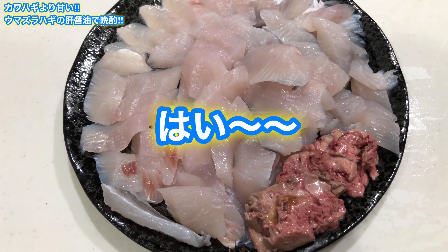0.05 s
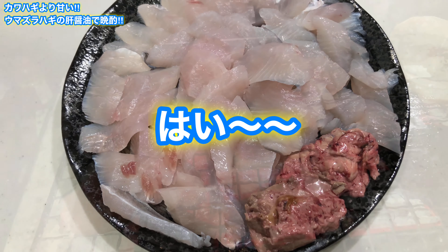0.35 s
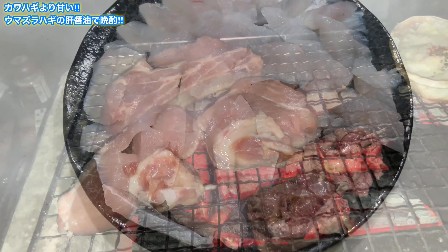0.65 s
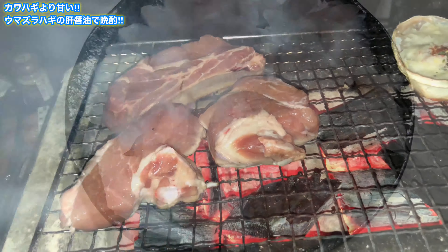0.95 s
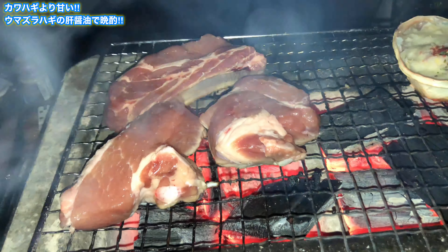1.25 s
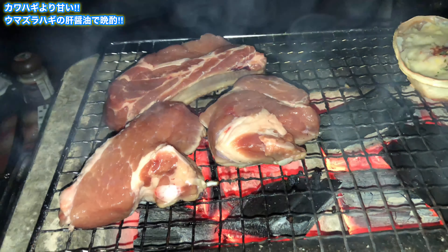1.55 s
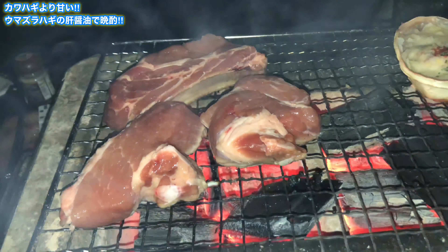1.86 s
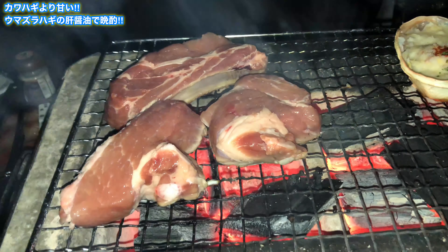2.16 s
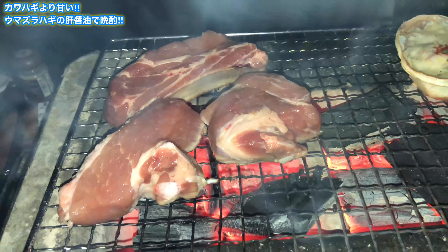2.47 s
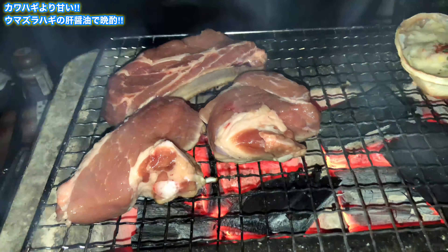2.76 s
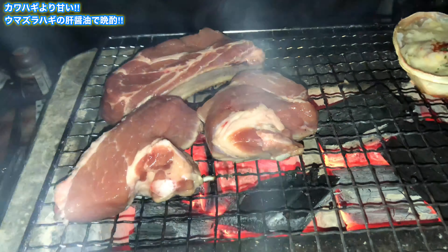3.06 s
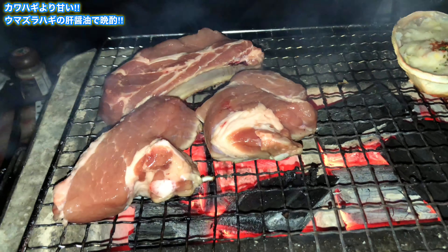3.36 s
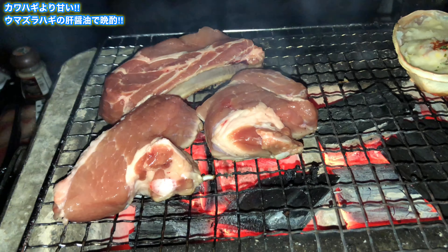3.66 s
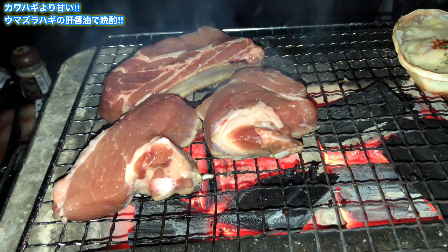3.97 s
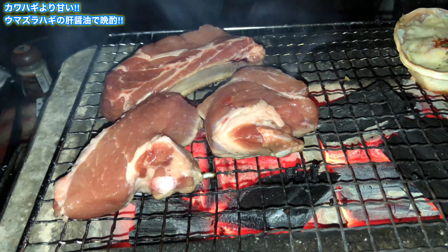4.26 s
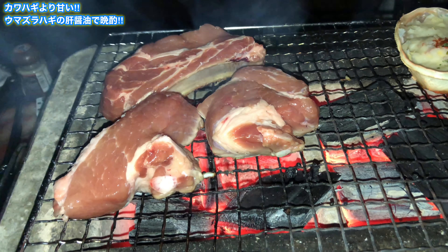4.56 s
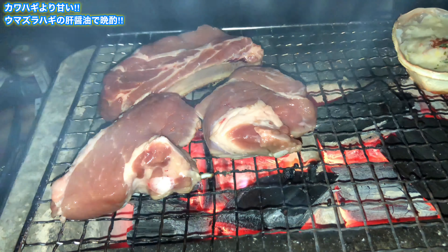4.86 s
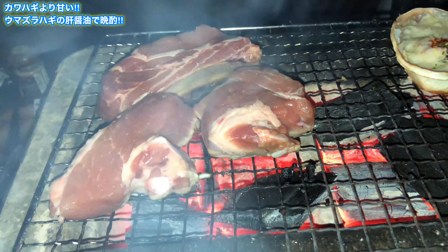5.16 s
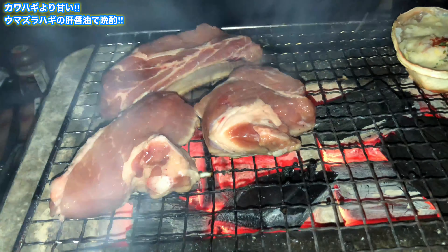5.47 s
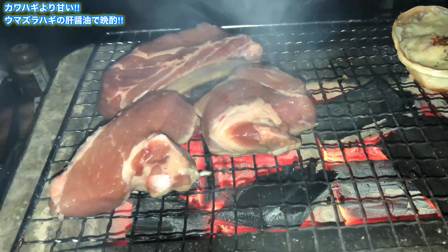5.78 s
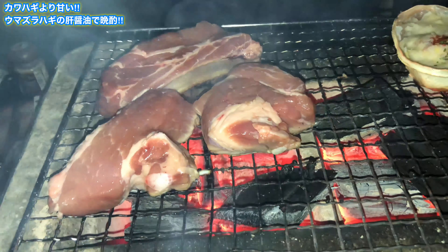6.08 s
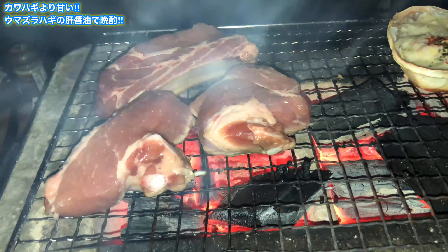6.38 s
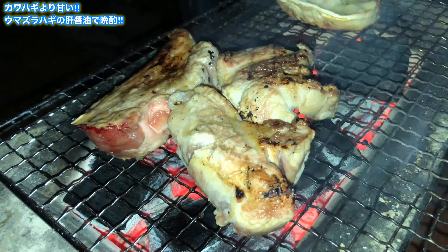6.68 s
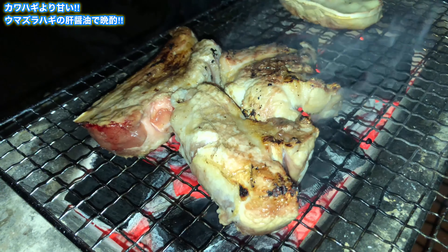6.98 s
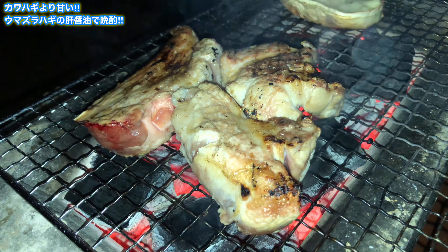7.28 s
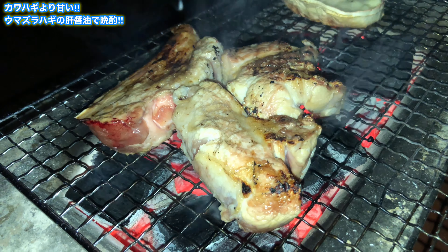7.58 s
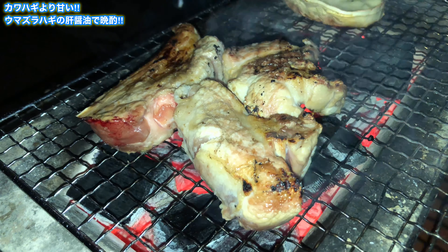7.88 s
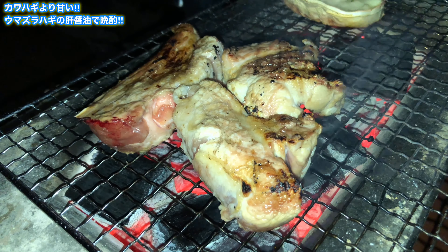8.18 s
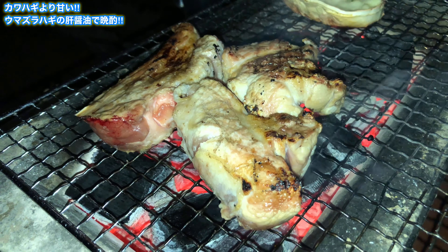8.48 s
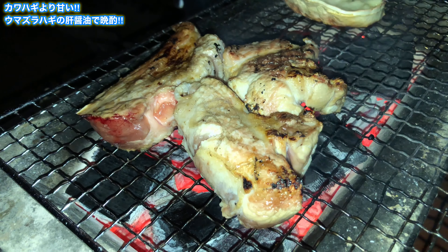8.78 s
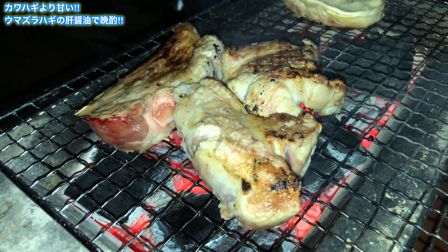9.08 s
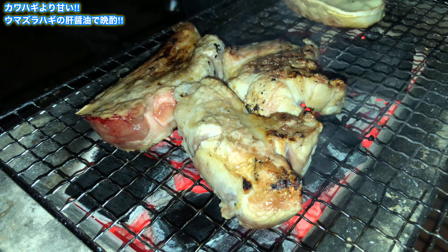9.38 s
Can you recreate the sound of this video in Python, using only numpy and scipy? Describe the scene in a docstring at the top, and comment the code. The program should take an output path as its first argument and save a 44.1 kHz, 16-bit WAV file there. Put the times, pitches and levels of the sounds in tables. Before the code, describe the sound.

Close sizzling and crackling of meat on a wire grill outdoors, with scattered fat pops and a soft low rumble underneath.

```python
"""Meat sizzles on a wire grill over charcoal, close up and outdoors. Countless tiny bubbles of fat burst into a
fizz; larger ones pop with a crack, and each pop is followed by a short low chirp. The grill fades in raw; after
a brief dip in level the meat is browned and the sizzle is louder. Underneath lie a low outdoor rumble that
steps up with it, soft gusts and faint distant hums."""
import sys
import numpy as np
from scipy import signal
from scipy.fft import rfft, irfft
from scipy.io import wavfile

SR = 44100
rng = np.random.default_rng(int(sys.argv[2]) if len(sys.argv) > 2 else 0)


def unload_wav(signal):
    """Save mono or channel-first audio to the path in sys.argv[1] as 16-bit WAV at rate SR, clipped to [-1, 1]."""
    wavfile.write(
        sys.argv[1],
        SR,
        np.round(np.clip(np.atleast_2d(signal).T, -1, 1) * 32767).astype(np.int16),
    )


N = 420713
TIME = np.arange(N) / SR
BROWNED_S = 6.55  # raw meat before this, browned after

# loud pops of fat: start_s, level_db, chirp_db, treble_db (the last two relative to level_db)
POPS = [(0.4246, -52, -1, 1), (0.495, -54, -6, 2.5), (0.7282, -51, -2.5, -1.5), (0.9879, -43, -5, -1),
        (1.0846, -44.5, -12, 1), (1.4746, -40, -10, 6.5), (1.4858, -39.5, 2, -1), (2.3296, -31, -2, 7.5),
        (2.4806, -23.5, -6, -4), (2.5687, -44.5, -3, -4), (2.7797, -37.5, -7, 3.5),
        (2.7953, -31.5, -3, 2.5), (2.8327, -46, -10, 1), (2.858, -39, -18, 5), (2.8816, -43, -8, 8),
        (2.892, -34.5, -9.5, 8.5), (2.9705, -39, -11, 3.5), (3.2439, -37, -5, 0.5),
        (3.7413, -39.5, -25, 1.5), (3.758, -33, -10, 0.5), (3.914, -36.5, -9, 3), (4.084, -42.5, -21, 2.5),
        (4.1931, -33.5, -5.5, -0.5), (4.3349, -41, -10, 4.5), (4.4108, -33, -6, 5.5),
        (4.6794, -35.5, -7, -0.5), (4.6928, -28.5, -10, -5), (4.703, -41, 3, 6.5), (4.8749, -37, -11, 1),
        (4.9874, -40.5, -5, 3), (5.109, -39, -11, 5.5), (5.2228, -38, -14, 10), (5.48, -42, -5, -1.5),
        (5.767, -42.5, -18, 3), (5.8827, -38.5, -7.5, 3.5), (5.904, -43.5, 3, 3), (6.048, -41.5, -6.5, 13),
        (6.1468, -39, -6, 5.5), (6.2565, -42, -4, -11), (6.7873, -28.5, -10.5, 3),
        (7.0514, -31.5, -19, -2.5), (7.1977, -35.5, -1.5, 5), (7.4675, -22.5, -11, -1.5),
        (7.8052, -29, -14, -3.5), (8.3535, -29.5, -8.5, -0.5), (8.5245, -33, -11, 4),
        (8.7014, -32.5, -12, 1), (8.758, -38.5, -7, 7), (8.7867, -27.5, -5, 3), (9.4965, -39.5, -22, 3)]


def sizzle(hiss_db=-5.0, flutter_db=2.5):
    """Near ticks, dense froth and hiss, voiced as a mid crackle and a high fizz that ride the boil."""
    # EQ curves of the bursting fat: frequency_hz, gain_db
    raw_eq = [(300, -11.5), (800, 0), (1250, -4.5), (1800, -1), (2800, -2), (3400, -3), (4300, -2),
              (4750, 2.5), (5300, -1.5), (7000, -4), (9000, -16.5)]
    browned_eq = [(300, -32), (800, -13), (1400, -7.5), (1900, -4.5), (2600, -0.5), (3300, -0.5),
                  (3900, -4), (4750, 0), (5600, -2), (7000, -2.5), (9000, -17.5)]
    fizz_eq = [(3000, -48.5), (5500, -23), (7000, -7.5), (8500, 0.5), (10500, 3), (13000, 2), (16500, 0)]
    ticks = bubbles(per_s=135, spread_db=7.5, max_spreads=2.29, decay_s=0.00043, chirp_gain=0.37)
    froth = bubbles(per_s=1400, spread_db=2.5, max_spreads=3.1, decay_s=0.00071, chirp_gain=0)
    hiss = gain_of(hiss_db + flutter_db * wander(48)) * rng.standard_normal(N)
    browned = TIME > BROWNED_S
    ticks *= gain_of(np.where(browned, -4.8, -2.3))  # on browned meat the ticks merge into froth
    bed = gain_of(-5.5) * froth + hiss
    frying = ticks + bed
    crackle = np.where(browned, unit_rms(colour(frying, browned_eq)), unit_rms(colour(frying, raw_eq)))
    fizz = unit_rms(colour(0.93 * ticks + bed, fizz_eq))  # the high fizz mixes ticks, froth and hiss
    fizz *= gain_of(0.46 * wander(39))  # the treble flickers
    boil_db, spray = boil(), spatter()
    crackle_gain = fader(raw_db=-52.5, browned_db=-47, start_s=0.19, fade_s=0.98)
    crackle_gain *= gain_of(0.61 * boil_db)  # the crackle follows the boil only partly
    fizz_gain = fader(raw_db=-48.5, browned_db=-44.5, start_s=0.27, fade_s=0.8) * gain_of(boil_db)
    return np.hypot(crackle_gain, spray) * crackle + np.hypot(fizz_gain, spray) * fizz


def bubbles(per_s, spread_db, max_spreads, decay_s, chirp_gain, clump_db=3, voices=48):
    """Bubbles of many sizes and pitches burst in random clumps; chirp_gain adds a tiny falling chirp."""
    out, t = np.zeros(N), np.arange(SR // 60) / SR
    odds = gain_of(clump_db * wander(14))
    onsets = np.flatnonzero(rng.random(N) < per_s / SR * odds / odds.mean())
    sizes = gain_of(spread_db * np.minimum(rng.exponential(1, len(onsets)), max_spreads))
    clicks = []
    for hz in np.linspace(1200, 15500, voices):
        tear = burst(t, decay_s * 2 ** rng.uniform(-0.72, 1), snap=0.7)
        clicks.append(unit_rms(ring(tear, hz, resonance=4.2, q=hz / 1100)))
    body = chirp_gain * unit_rms(chirp(t, hz=1400, swell_s=0.001, hold=0.83))
    picks = rng.integers(0, voices, len(onsets))
    body_shares = rng.random(len(onsets)) ** 2
    for onset, size, pick, share in zip(onsets, sizes, picks, body_shares):
        add(out, onset / SR, size * (clicks[pick] + share * body))
    return unit_rms(out)


def boil(full_boil_s=1.81, warm_db_per_s=3):
    """How hard the fat boils, in dB from its steady state: it warms up, then swells with each spurt."""
    # spurts as juice reaches the heat: middle_s, length_s, rise_db
    spurts = [(1.46, 0.25, 2.5), (2.847, 0.11, 6.5), (3.28, 0.096, 3.5), (3.856, 0.2, 8), (4.27, 0.072, 7),
              (4.44, 0.036, 10), (4.88, 0.16, 9), (5.5, 0.25, 5.5), (5.882, 0.23, 4.5), (6.076, .1, 7),
              (6.396, 0.084, 7.5), (6.87, 0.4, 4.5), (7.24, 0.21, 4), (7.483, 0.046, 7), (7.93, 0.027, 12),
              (8.71, 1.67, 5)]
    warming_db = warm_db_per_s * np.minimum(TIME - full_boil_s, 0)
    return warming_db + sum(db * swell(middle_s, length_s) for middle_s, length_s, db in spurts)


def pops(crack_trim_db=0.5, spit_trim_db=4.0, centre_hz=2050):
    """Each loud pop sounds as a crack and a bright spit, followed by a short low chirp."""
    # EQ curves of a pop's mid crack and bright spit: frequency_hz, gain_db
    crack_eq = [(300, -24), (1050, -9.5), (1800, 5), (2700, 4.5), (3900, 2), (5000, 1), (6200, -3.5),
                (8000, -5), (16000, -24)]
    spit_eq = [(2000, -80), (5000, -13.5), (7000, -1.5), (10000, 6), (13000, 4), (16000, 5)]
    out, t = np.zeros(N), np.arange(SR // 25) / SR
    for start_s, level_db, chirp_db, treble_db in POPS:
        if start_s > BROWNED_S:  # crust cracks higher; a near-steady chirp sits over a lower one
            stiffness = 1.12
            body = chirp(t, hz=908, swell_s=0.0019, hold=26.0)
            body += 0.96 * chirp(t, hz=520, swell_s=0.002, hold=2.7)
        else:  # one falling chirp, deeper for a louder pop
            stiffness = 1
            body = chirp(t, hz=1150 / 2 ** ((level_db + 26) / 40), swell_s=0.00172, hold=1.08)
        tear = burst(t, 0.00064 * 2 ** rng.uniform(-0.46, 1), snap=0.58)
        add(tear, rng.uniform(0.0011, 0.0027), 0.38 * burst(t, 0.00044, snap=0))  # the film tears twice
        # a pop with more chirp and less treble rings lower
        ring_hz = centre_hz * 2 ** (treble_db / 5.5 - chirp_db / 15.5)
        tear = ring(tear, ring_hz, resonance=1.3, q=2.2)
        crack = colour(tear, crack_eq * np.array([stiffness, 1]))
        spit = colour(tear, spit_eq)
        gains = gain_of([crack_trim_db, treble_db + spit_trim_db, chirp_db])
        pop = sum(gain * part / np.linalg.norm(part) for gain, part in zip(gains, [crack, spit, body]))
        add(out, start_s, gain_of(level_db) * pop * np.sqrt(0.005 * SR))  # energy as rms over 5 ms
    return out


def thuds():
    """Dull low thumps that fall in pitch, with no crack."""
    # low thumps: start_s, peak_db, start_pitch_hz, swell_s
    thumps = [(1.840, -26, 483, 0.0019), (3.701, -30.5, 544, 0.0012), (4.633, -34.5, 810, 0.0037)]
    out, t = np.zeros(N), np.arange(SR // 25) / SR
    for start_s, peak_db, hz, swell_s in thumps:
        add(out, start_s, gain_of(peak_db) * chirp(t, hz, swell_s, hold=1.7))
    return out


def spatter(spray_db=-16.5, decay_s=0.012):
    """Fat thrown by a pop fizzes on: the gain of that extra sizzle as it dies away."""
    kicks = np.zeros(N)
    for start_s, level_db, _, treble_db in POPS:
        add(kicks, start_s, gain_of([level_db + treble_db + spray_db]))
    return signal.lfilter([1], [1, -np.exp(-1 / (decay_s * SR))], kicks + 1e-12)


def burst(t, decay_s, snap):
    """A film of fat tears: one sharp spike of pressure, then a quickly dying spray."""
    spray = rng.standard_normal(len(t)) * np.exp(-t / decay_s)
    spray /= np.linalg.norm(spray)
    spray[0] += snap
    return spray


def ring(x, hz, resonance, q):
    """The cavity of a bubble rings for a few cycles."""
    return x + resonance * signal.lfilter(*signal.iirpeak(hz, q, fs=SR), x)


def chirp(t, hz, swell_s, hold):
    """A short low chirp that swells, dies and falls in pitch; more hold slows the fall."""
    fall_s = hold * swell_s
    phase = 2 * np.pi * hz * fall_s * np.log1p(t / fall_s)
    return np.sin(phase) * t / swell_s * np.exp(1 - t / swell_s)


def reflections(x, echo_db=-20, echo_s=0.0052, tail_db=-17, t60_s=0.32):
    """Adds one near echo and a short scatter from the grill and the ground."""
    t = np.arange(SR // 5) / SR
    tail = rng.standard_normal(len(t)) * gain_of(-60 * t / t60_s)
    tail *= gain_of(tail_db) / np.linalg.norm(tail)
    add(tail, echo_s, gain_of([echo_db]))
    return x + signal.oaconvolve(x, tail)[:N]


def rumble(sway_db=1.0, floor_db=-60.5):
    """Low outdoor noise that rises from a quiet floor and sways a little."""
    # EQ curves of the rumble under raw and browned meat: frequency_hz, gain_db
    raw_eq = [(24, -52), (42, -9.5), (65, -5), (110, 1.5), (165, 0), (210, -6.5), (300, -5), (450, -10.5),
              (800, -17), (1200, -25), (16000, -37)]
    browned_eq = [(24, -48), (40, 2.5), (70, 1), (125, 0), (175, 4.5), (230, 2.5), (310, 2.5), (450, -1.5),
                  (780, -8), (1150, -18), (16000, -52)]
    air = rng.standard_normal(N) * gain_of(sway_db * wander(30))
    raw = unit_rms(colour(air, raw_eq, size=16384))
    browned = unit_rms(colour(air, browned_eq, size=16384))
    gain = fader(raw_db=-50.5, browned_db=-43, start_s=0.43, fade_s=0.83)
    return np.hypot(gain, gain_of(floor_db)) * np.where(TIME > BROWNED_S, browned, raw)


def hums(drift=0.0074, waver_db=1.0):
    """Faint distant tones that waver in pitch and strength."""
    # sine hums: start_s, end_s, pitch_hz, level_db
    tones = [(0, 0.68, 99, -69.5), (1.2, 7.8, 108, -63), (7.7, 9.8, 173.4, -50.5)]
    out = np.zeros(N)
    drifting_time = np.cumsum(1 + drift * wander(11)) / SR
    waver = unit_rms(gain_of(waver_db * wander(8.8)))
    for start_s, end_s, hz, level_db in tones:
        gate = np.clip(np.minimum(TIME - start_s, end_s - TIME) / 0.13, 0, 1)
        out += gain_of(level_db) * gate * np.sqrt(2) * np.sin(2 * np.pi * hz * drifting_time)
    return out * waver


def gusts(q=1.7):
    """Soft gusts of air, each a swell of noise around its own pitch."""
    # low buffets and a higher rush: middle_s, length_s, pitch_hz, level_db
    breezes = [(0.828, 0.27, 62, -54), (2.35, .5, 62, -61), (3.447, .3, 85, -60), (5.6, 0.26, 100, -59),
               (5.7, 2.1, 950, -64)]
    out, air = np.zeros(N), rng.standard_normal(N)
    for middle_s, length_s, hz, level_db in breezes:
        band = signal.lfilter(*signal.iirpeak(hz, q, fs=SR), air)
        out += gain_of(level_db) * swell(middle_s, length_s) * unit_rms(band)
    return out


def fader(raw_db, browned_db, start_s, fade_s, dip_db=-22, dip_s=0.02):
    """Gain of a layer: it fades in to its raw level, dips briefly and holds at its browned level."""
    fade = np.clip((TIME - start_s) / fade_s, 0, 1)
    dip = np.exp(-((TIME - BROWNED_S) / dip_s) ** 2)
    return fade * gain_of(np.where(TIME > BROWNED_S, browned_db, raw_db) + dip_db * dip)


def swell(middle_s, length_s):
    """A smooth rise and fall that peaks at 1."""
    return np.exp(-(2 * (TIME - middle_s) / length_s) ** 2)


def wander(rate_hz):
    """Slow random motion of rms 1, no faster than about rate_hz."""
    hz = np.fft.rfftfreq(N, 1 / SR)
    return unit_rms(irfft(rfft(rng.standard_normal(N)) * np.exp(-(hz / rate_hz) ** 2), N))


def colour(x, eq, size=4096):
    """Minimum-phase EQ, so that clicks keep their sharp attack."""
    eq_hz, eq_db = np.transpose(eq)
    hz = abs(np.fft.fftfreq(size, 1 / SR))
    log_gain = np.log(gain_of(np.interp(np.log(hz + 1), np.log(eq_hz), eq_db)))
    taps = np.fft.ifft(np.exp(np.conj(signal.hilbert(log_gain)))).real
    return signal.oaconvolve(x, taps[:size // 2])[:len(x)]


def gain_of(db):
    """Decibels to amplitude."""
    return 10 ** (np.asarray(db) / 20)


def unit_rms(x):
    """Scales to rms 1."""
    return x / np.sqrt(np.mean(x ** 2) + 1e-20)


def add(mix, start_s, sound):
    """Mixes a sound in at start_s."""
    part = mix[max(round(start_s * SR), 0):][:len(sound)]
    part += sound[:len(part)]


def scene():
    """The grill over its outdoor bed, in mono."""
    return (sizzle() + reflections(pops() + thuds()) + rumble() + hums() + gusts())[None]


def record(dry, cutoff_hz=16050):
    """A steep low-pass trims the very top of the fizz."""
    lowpass = signal.firwin(511, cutoff_hz, window=("kaiser", 9), fs=SR)
    return signal.oaconvolve(dry, lowpass[None], "same")


dry = scene()
out = record(dry)
unload_wav(out)
```